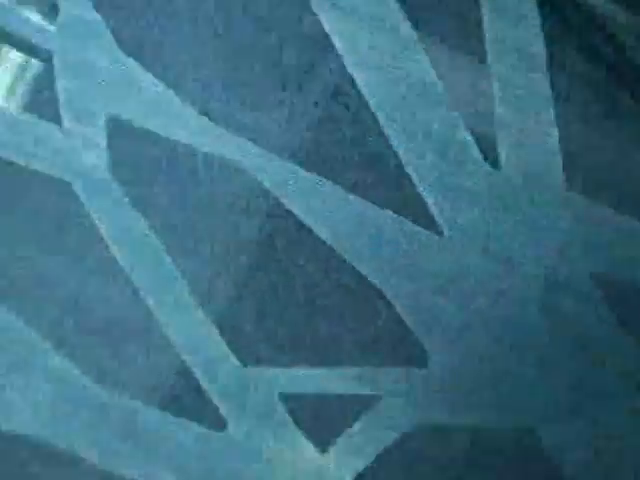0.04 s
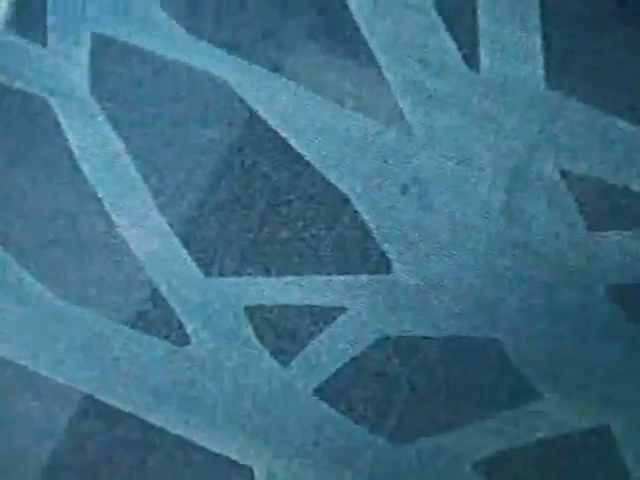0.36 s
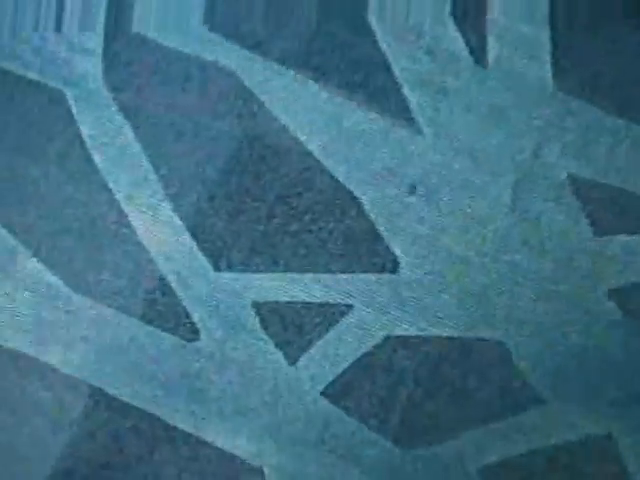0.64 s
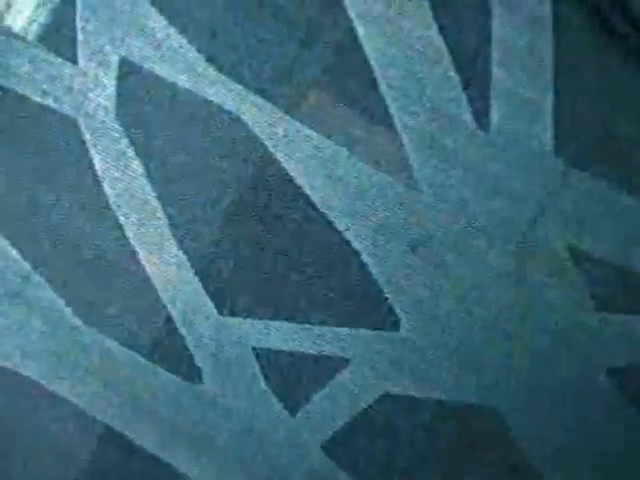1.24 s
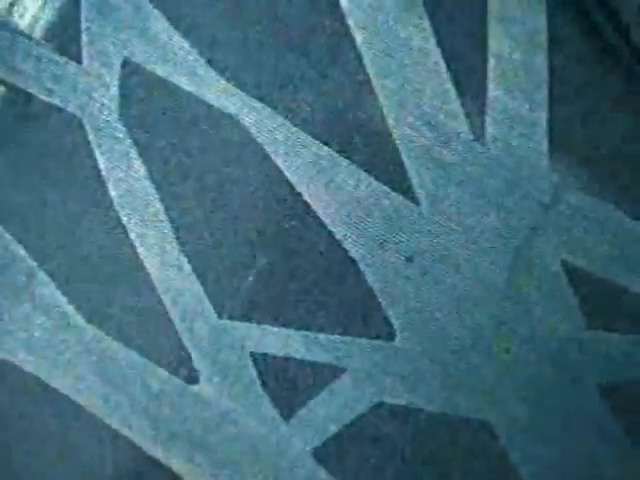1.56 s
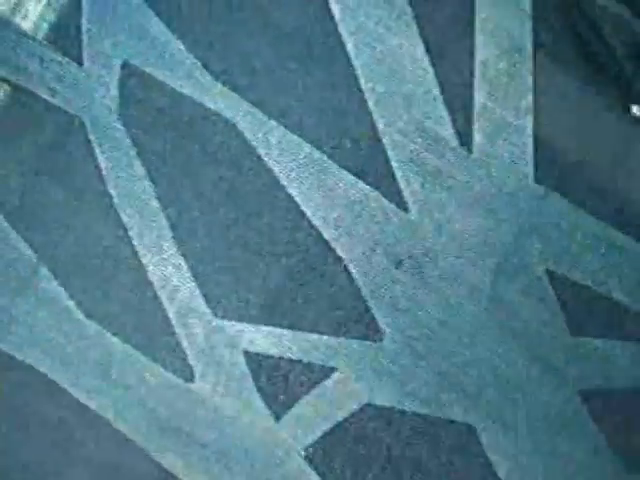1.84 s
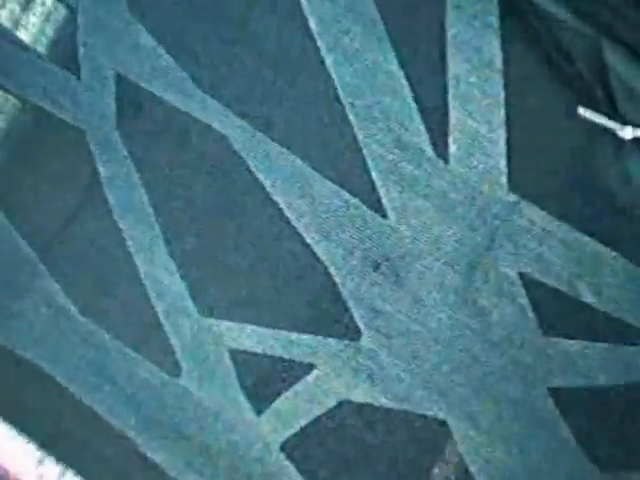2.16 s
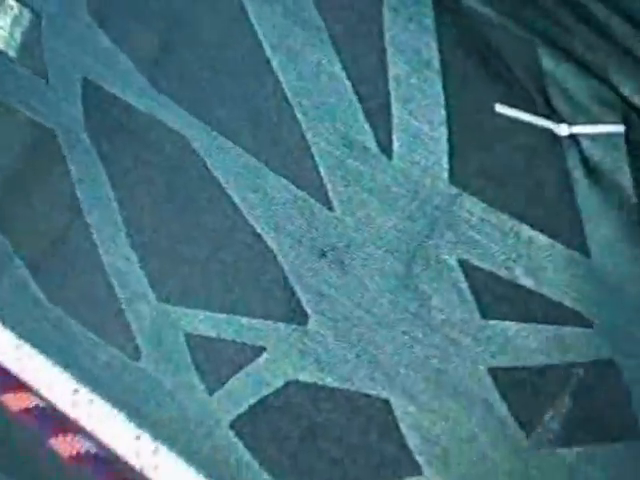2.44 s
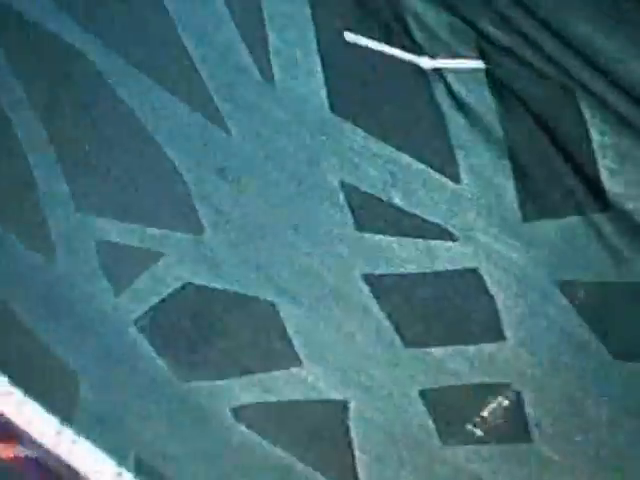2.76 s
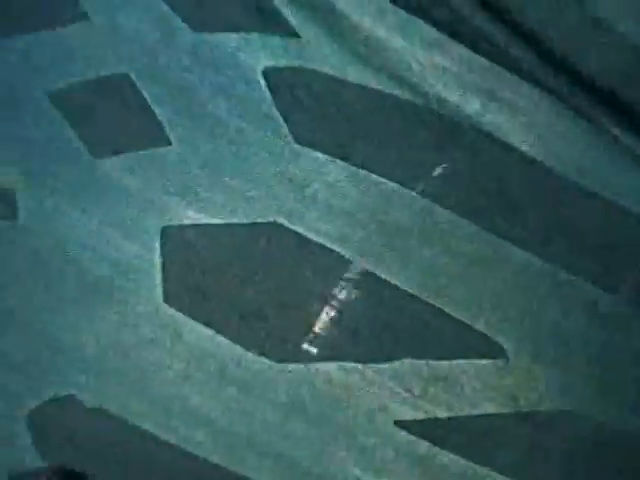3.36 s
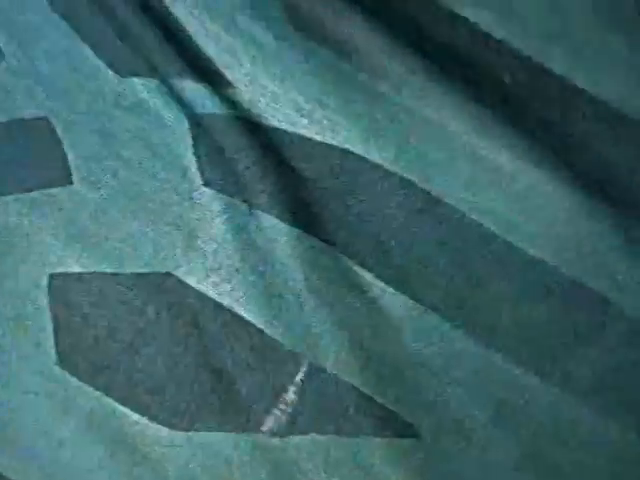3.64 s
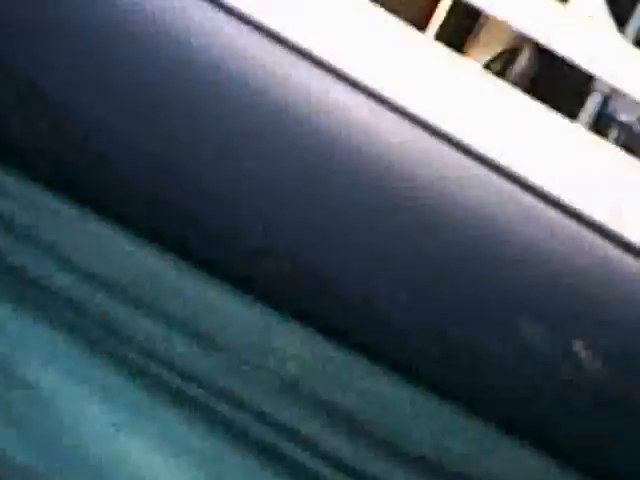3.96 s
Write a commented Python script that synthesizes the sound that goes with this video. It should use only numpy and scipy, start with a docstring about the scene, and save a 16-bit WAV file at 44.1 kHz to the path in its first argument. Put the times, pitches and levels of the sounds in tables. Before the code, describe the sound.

Air rushes steadily over the microphone, with a breathy whistle growing from halfway.

```python
"""Outdoors, a low pop sounds and air rushes steadily over a small camera's housing, where a bright
resonance flutters. One short knock follows at once. Faint squeaks and short low pops come and go.
From halfway a breathy edge tone grows in spurts, and a weak rumble rises at the end.
Throughout, the camera overloads softly and holds each sample at a low rate, which mirrors the
spectrum into a gritty treble."""
import sys
import numpy as np
from scipy import signal
from scipy.fft import rfft, irfft
from scipy.io import wavfile
from scipy.ndimage import map_coordinates

SR = 44100
rng = np.random.default_rng(int(sys.argv[2]) if len(sys.argv) > 2 else 0)


def wav_out(sig):
    """Save sig, one row per channel (or a flat mono array), as 16-bit PCM at SR to the path in sys.argv[1]."""
    wavfile.write(sys.argv[1], SR, np.round(np.clip(np.atleast_2d(sig).T, -1, 1) * 32767).astype(np.int16))


N = 176400
T = np.arange(N) / SR

# Noise spectra (f/Hz, relative density level/dB), each with its envelope (t/s, level/dB):
# broad rush of air
RUSH_SPECTRUM = [(20, -33), (60, -30.5), (150, -23.5), (280, -13), (420, -8), (650, -0.5), (950, 0.5),
                 (1450, 2.5), (2050, 2), (2500, 1.5), (2850, 2), (3080, -8.5), (3300, -10), (4000, -7)]
RUSH_ENVELOPE = [(0, -12.5), (.06, -17), (.22, -19.5), (.6, -20), (1.1, -20), (1.4, -20), (2.1, -20),
                 (2.8, -21), (3.4, -20.5), (3.85, -20), (4, -20)]
# bright resonance of the housing
HOUSING_SPECTRUM = [(2000, -29.5), (2350, -8), (2580, -4.5), (2790, 2), (2880, -3.5), (3020, -10),
                    (3200, -15)]
HOUSING_ENVELOPE = [(0, -21), (.1, -21), (.17, -22), (.22, -21.5), (.4, -24), (.45, -17.5), (.55, -24),
                    (.92, -24), (.98, -23.5), (1.05, -21.5), (1.17, -21), (1.32, -25), (1.9, -22),
                    (2.8, -22), (3.2, -24), (3.33, -23.5), (3.55, -24.5), (4, -21.5)]
# thin hiss above the resonance
HISS_SPECTRUM = [(2700, -26), (3050, -15), (3300, -1.5), (3570, 2), (3800, 0), (4000, 3)]
HISS_ENVELOPE = [(0, -45), (.07, -22), (.11, -40), (.17, -27), (.24, -37.5), (.46, -29.5), (.62, -35.5),
                 (1.05, -35), (1.5, -36), (1.7, -29.5), (2.05, -33), (2.25, -27.5), (2.5, -30.5),
                 (3.1, -30), (3.6, -29), (3.93, -29.5), (4, -24)]
# low rumble of the air
RUMBLE_SPECTRUM = [(20, 6.5), (120, 7), (250, 6), (500, -15), (1000, -50)]
RUMBLE_ENVELOPE = [(0, -49), (.3, -69), (1.8, -66), (2.4, -56), (3.85, -50), (4, -38)]
# spurts of the edge tone (t/s, level/dB)
WHISTLE_ENVELOPE = [(0, -71), (2.05, -42), (2.18, -29), (2.26, -26), (2.35, -19), (2.43, -28), (2.48, -19),
                    (2.54, -21.5), (2.6, -21), (2.655, -22), (2.78, -20), (2.89, -23.5), (2.98, -20),
                    (3.06, -20), (3.17, -23), (3.25, -22), (3.32, -18), (3.41, -22.5), (3.52, -14.5),
                    (3.63, -20), (3.8, -18), (3.86, -20), (3.94, -13.5), (4, -22)]
# faint, short low pops (t/s, pulse level/dB)
LOW_POPS = [(.002, -18), (0.08, -36), (.142, -29), (.623, -27), (0.74, -28), (.97, -26.5), (1.238, -32),
            (1.738, -38), (2.313, -32), (2.392, -27), (2.892, -26), (3.123, -28), (3.237, -25),
            (3.391, -23.5), (3.546, -26), (3.699, -25), (3.787, -29), (3.959, -27)]
# brief faint whistles (t/s, duration/s, start f/Hz, end f/Hz, level/dB)
SQUEAKS = [(0.387, 0.065, 490, 465, -34), (.95, 0.055, 2590, 2650, -20), (1.02, 0.08, 3280, 3100, -30),
           (1.129, 0.11, 2450, 2580, -20), (1.319, 0.068, 296, 335, -37.5),
           (1.605, 0.065, 1252, 1207, -25.5), (2.012, 0.11, 568, 534, -36), (2.294, 0.051, 971, 932, -29),
           (2.985, .11, 3280, 3020, -26.5), (3.147, 0.052, 3030, 3040, -31)]


def airflow():
    """Turbulence gives broadband noise and excites a housing resonance; one flutter modulates it all."""
    flutter_hz, housing_depth_db, shared_depth_db = 25, 0.58, 0.52
    housing = noise(HOUSING_SPECTRUM) * envelope(HOUSING_ENVELOPE)
    housing *= gain(housing_depth_db * drift(flutter_hz))
    rush = turbulent_patches(noise(RUSH_SPECTRUM)) * envelope(RUSH_ENVELOPE)
    hiss = noise(HISS_SPECTRUM) * envelope(HISS_ENVELOPE)
    return (rush + housing + hiss) * gain(shared_depth_db * drift(flutter_hz))


def turbulent_patches(rush):
    """Turbulence modulates the amplitude of narrow bands, each for a moment; the result has rms 1."""
    depth_db, patch_hz, patch_s = 1.0, 80.2, 0.06
    size, hop = 1024, 256
    spectra = signal.stft(rush, SR, nperseg=size, noverlap=size - hop)[2]
    bins, frames = np.indices(spectra.shape)
    position = [bins * SR / size / patch_hz, frames * hop / SR / patch_s]
    patches = map_coordinates(rng.standard_normal(spectra.shape), position, order=1, mode="mirror")
    spectra *= gain(depth_db * unit_rms(patches))
    return unit_rms(signal.istft(spectra, SR, nperseg=size, noverlap=size - hop)[1][:N])


def whistle():
    """Edge tone: a wavering core sounds within a wider band of resonance-filtered turbulence."""
    centre_hz, waver_hz, band_hz, core_power = 1811, 15.03, 167, 0.34
    core = unit_rms(np.sin(phase(centre_hz + waver_hz * drift(38.5))))
    carrier = np.exp(2j * np.pi * centre_hz * T)
    modulation = drift(band_hz / 2) + 1j * drift(band_hz / 2)
    breath = unit_rms((carrier * modulation).real)
    return envelope(WHISTLE_ENVELOPE) * (np.sqrt(core_power) * core + np.sqrt(1 - core_power) * breath)


def low_pops():
    """Smooth pulses lack treble: faint, short low pops, some at set times and some at random."""
    random_per_s, random_db = 16, -40.5
    pulse_s, undershoot_s, undershoot_share = 0.0006, 0.0037, 0.76
    impulses = gain(random_db) * (rng.random(N) < random_per_s / SR)
    for time_s, db in LOW_POPS:
        impulses[round(time_s * SR)] = gain(db)
    impulses *= rng.choice([-1, 1], N)
    t = np.arange(-1000, 1001) / SR
    pulse = np.exp(-0.5 * (t / pulse_s) ** 2)
    undershoot = np.exp(-0.5 * (t / undershoot_s) ** 2) * undershoot_share * pulse_s / undershoot_s
    return signal.oaconvolve(impulses, pulse - undershoot, "same")


def knock():
    """Damped oscillation: one hollow knock swells for three cycles and dies quickly."""
    onset_s, rise_s, hz, peak_db = 0.1385, 0.0032, 932, -7
    age = np.maximum(T - onset_s, 0)
    swell = age / rise_s * np.exp(1 - age / rise_s)
    return gain(peak_db) * swell * np.sin(2 * np.pi * hz * age)


def squeaks():
    """Random frequency modulation roughens short whistles that glide and settle."""
    waver_hz = 36.5
    sound = np.zeros(N)
    for onset_s, duration_s, start_hz, end_hz, db in SQUEAKS:
        progress = np.clip((T - onset_s) / duration_s, 0, 1)
        glide_hz = end_hz + (start_hz - end_hz) * (1 - progress) ** 2
        swell = np.sqrt(2 * abs(np.sin(np.pi * progress)))
        sound += gain(db) * swell * np.sin(phase(glide_hz + waver_hz * drift(129)))
    return sound


def rumble():
    """Slow pressure fluctuations of the air form a weak low-frequency noise."""
    return noise(RUMBLE_SPECTRUM) * envelope(RUMBLE_ENVELOPE)


def gain(db):
    """Amplitude ratio of a level in decibels."""
    return 10 ** (np.asarray(db) / 20)


def unit_rms(x):
    """Normalisation to rms 1."""
    return x / np.sqrt(np.mean(abs(x) ** 2) + 1e-20)


def envelope(points):
    """Amplitude over time, interpolated between (t/s, level/dB) points."""
    return gain(np.interp(T, *np.transpose(points)))


def phase(hz):
    """Phase in radians is the time integral of angular frequency."""
    return 2 * np.pi * np.cumsum(hz) / SR


def noise(spectrum):
    """Spectral shaping of white noise, rolled off above the last point; rms 1."""
    points_hz, db = np.transpose(spectrum)
    hz = np.fft.rfftfreq(N, 1 / SR)
    shape = gain(np.interp(np.log(hz + 1), np.log(points_hz), db))
    shape /= 1 + (hz / points_hz[-1]) ** 20
    return unit_rms(irfft(rfft(rng.standard_normal(N)) * shape, N))


def drift(cutoff_hz):
    """Low-pass filtered noise gives a slow random fluctuation of rms 1."""
    hz = np.fft.rfftfreq(N, 1 / SR)
    return unit_rms(irfft(rfft(rng.standard_normal(N)) / (1 + (hz / cutoff_hz) ** 2), N))


def scene():
    """Superposition: all sources add in one channel."""
    return (airflow() + whistle() + low_pops() + knock() + squeaks() + rumble())[None]


def record(dry):
    """Saturation rounds the peaks; a zero-order hold makes spectral images, which a low-pass limits."""
    hold_hz, cutoff_hz = 8000, 12480
    ceiling, knee = 0.44, 3.5
    sampled = signal.resample(dry[0], round(N * hold_hz / SR))
    saturated = sampled / (1 + abs(sampled / ceiling) ** knee) ** (1 / knee)
    held = saturated[np.arange(N) * hold_hz // SR]
    low_pass = signal.firwin(601, cutoff_hz, window=("kaiser", 9), fs=SR)
    return signal.oaconvolve(held, low_pass, "same")[None]


dry = scene()
out = record(dry)
wav_out(out)
```